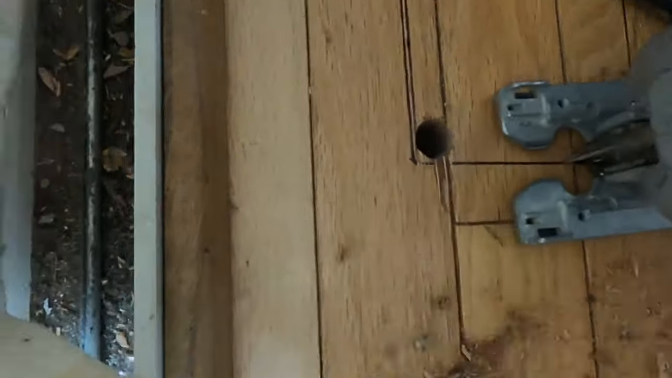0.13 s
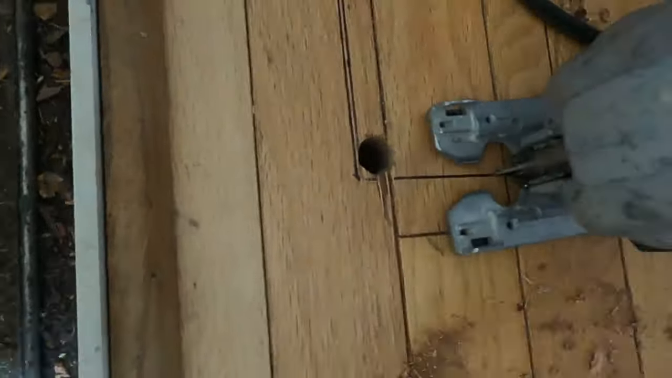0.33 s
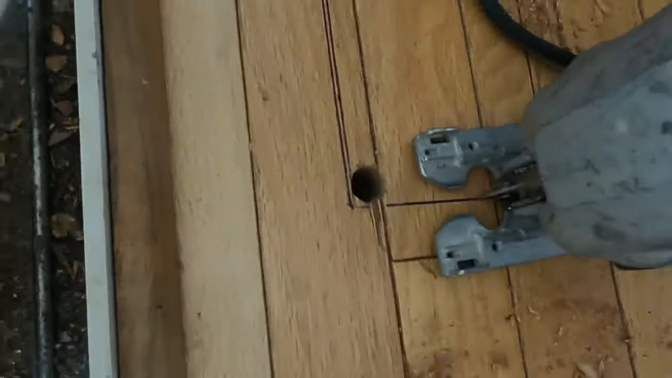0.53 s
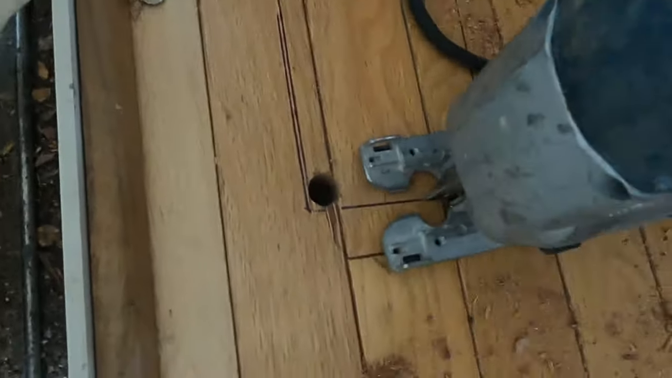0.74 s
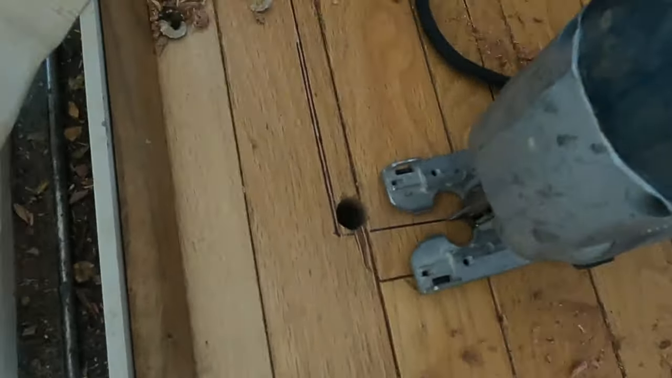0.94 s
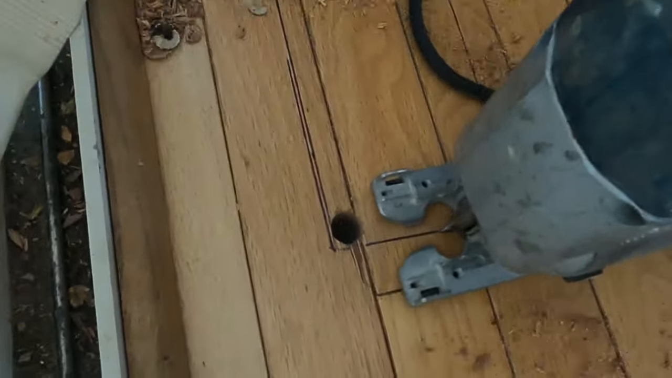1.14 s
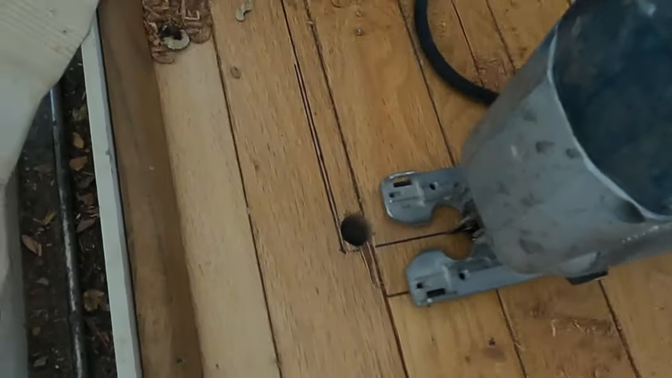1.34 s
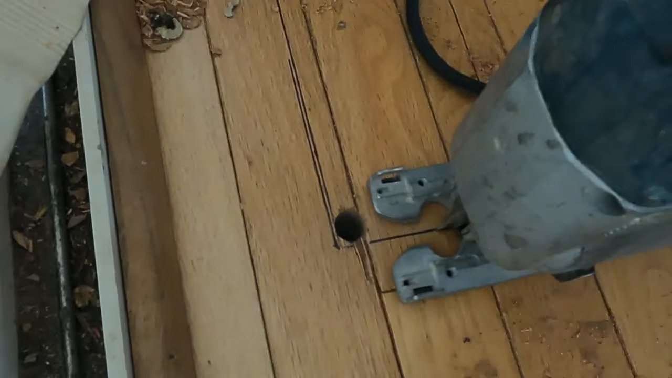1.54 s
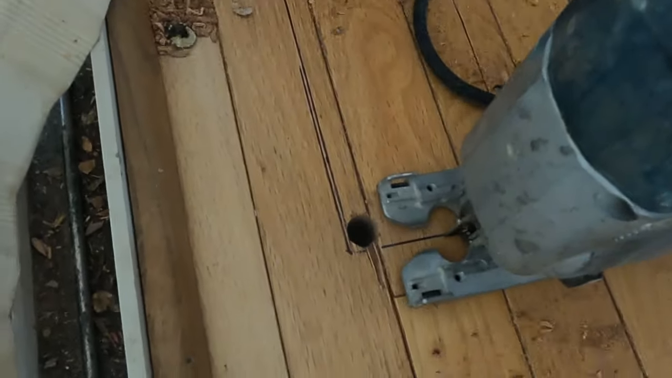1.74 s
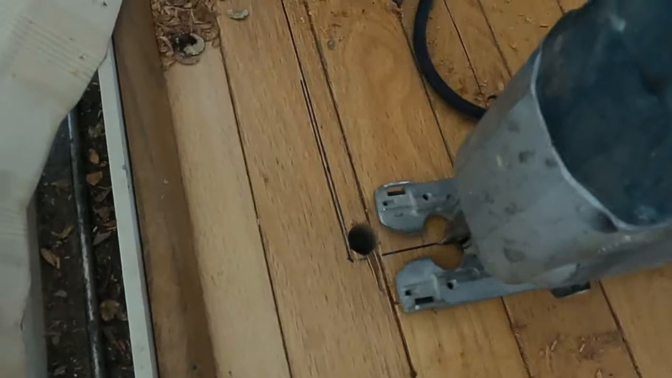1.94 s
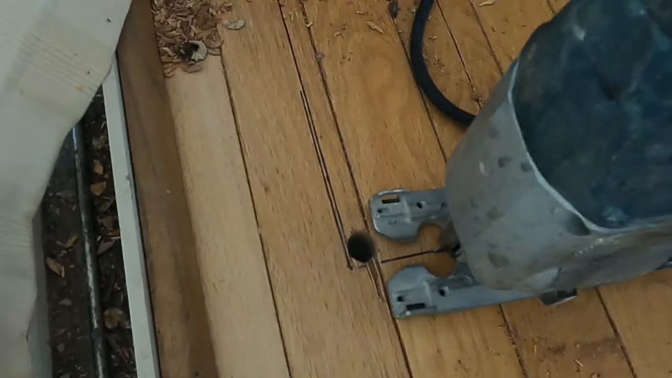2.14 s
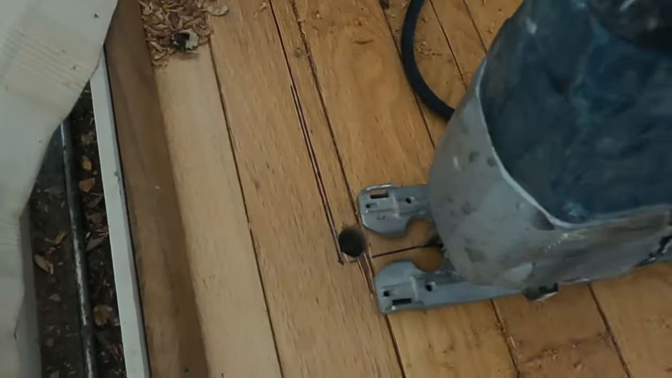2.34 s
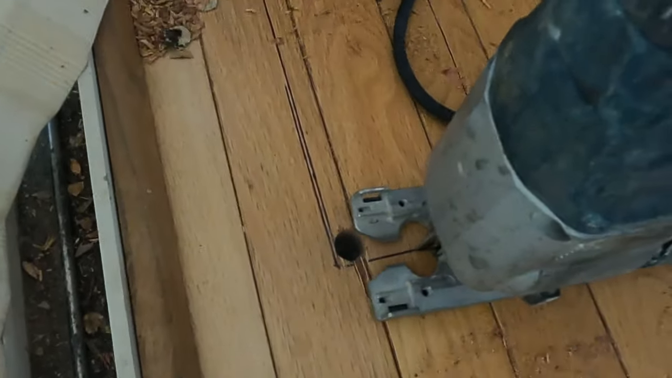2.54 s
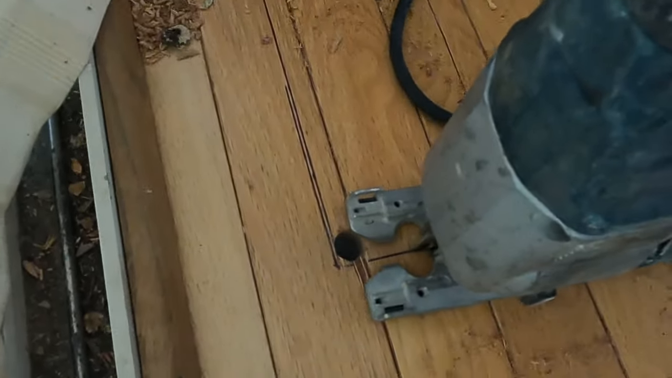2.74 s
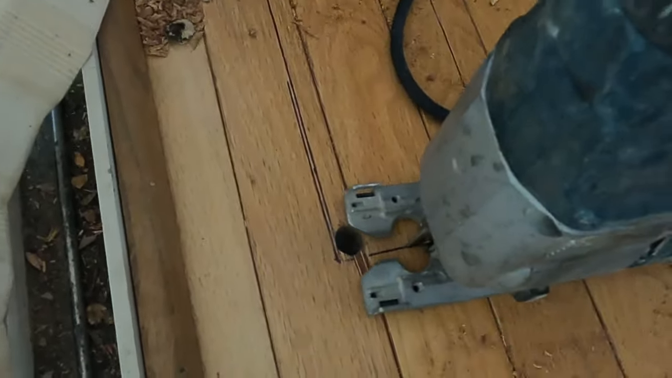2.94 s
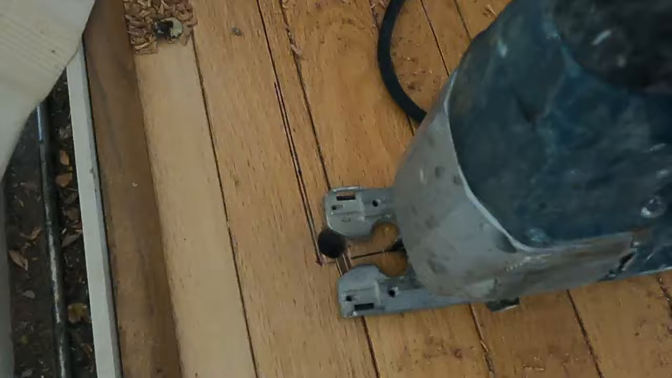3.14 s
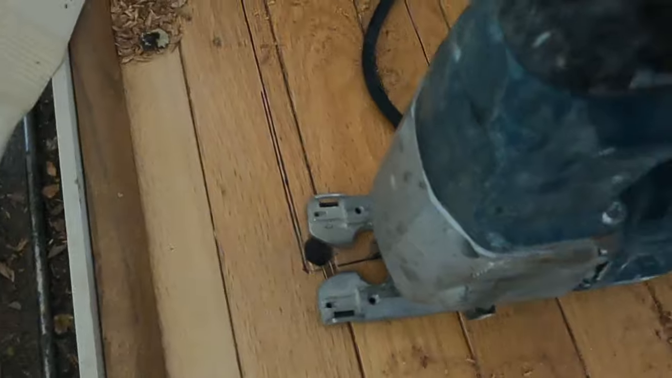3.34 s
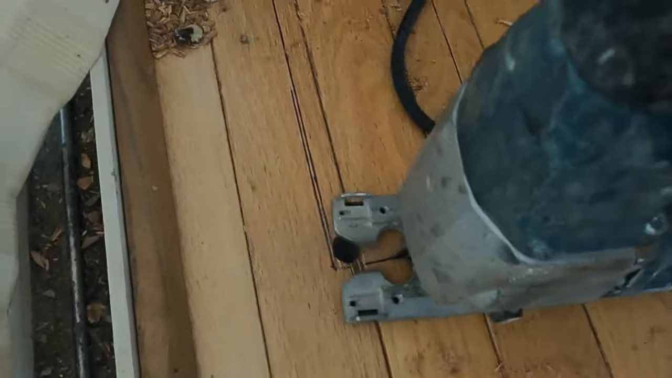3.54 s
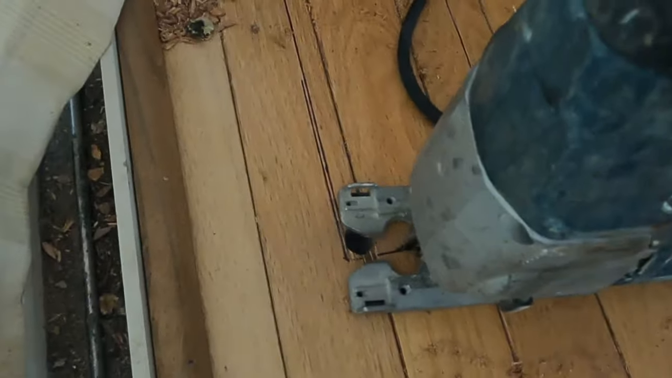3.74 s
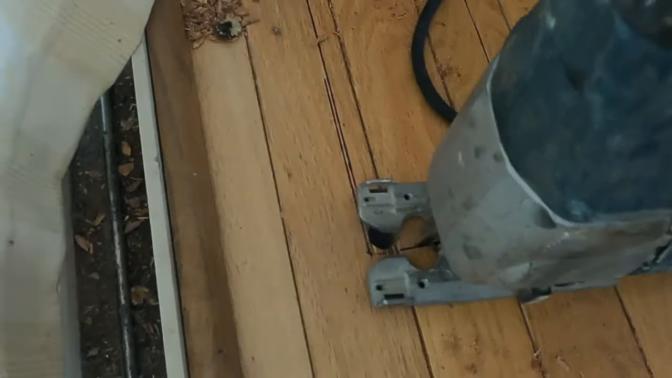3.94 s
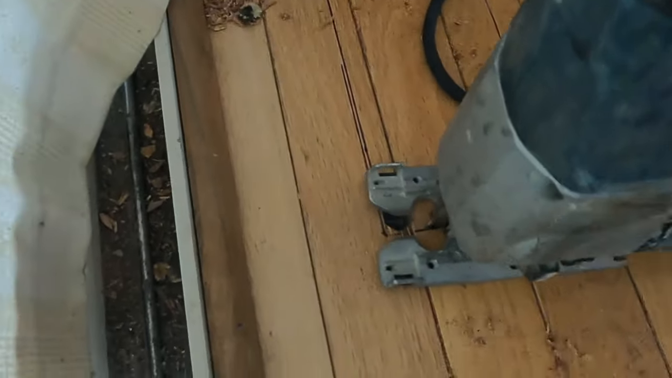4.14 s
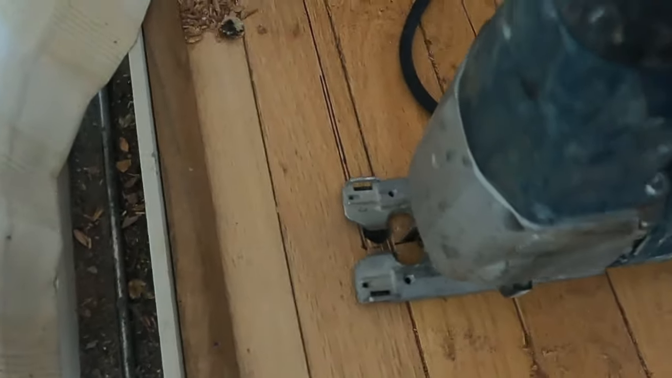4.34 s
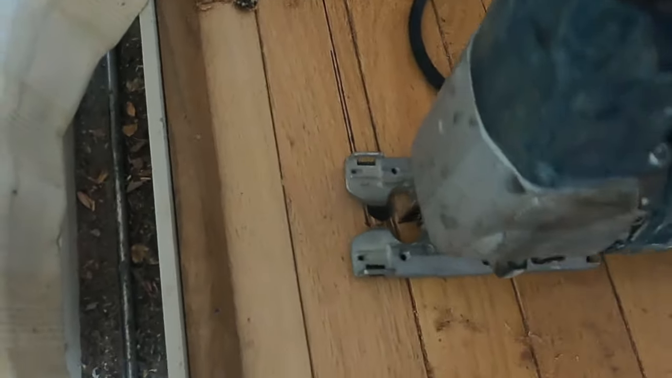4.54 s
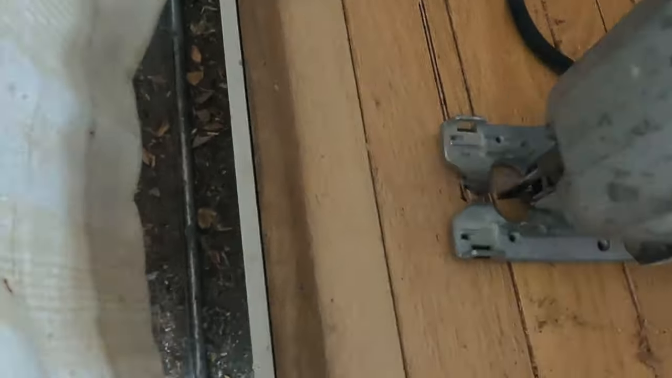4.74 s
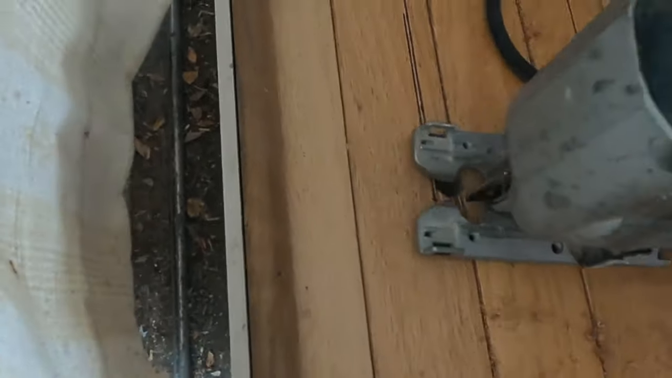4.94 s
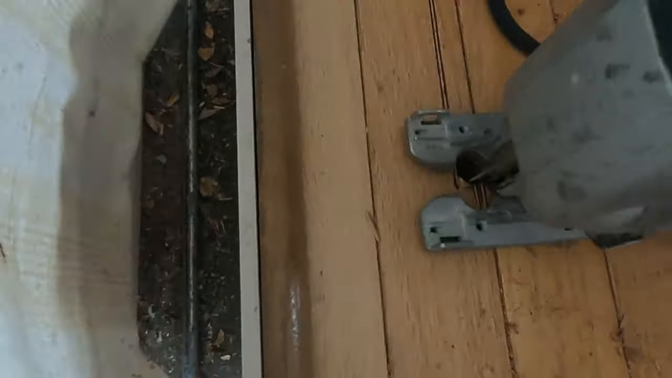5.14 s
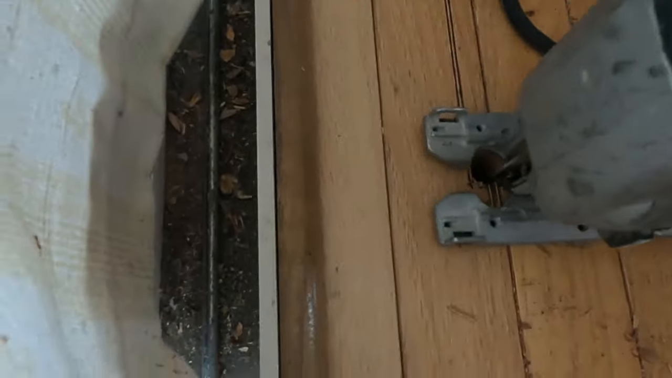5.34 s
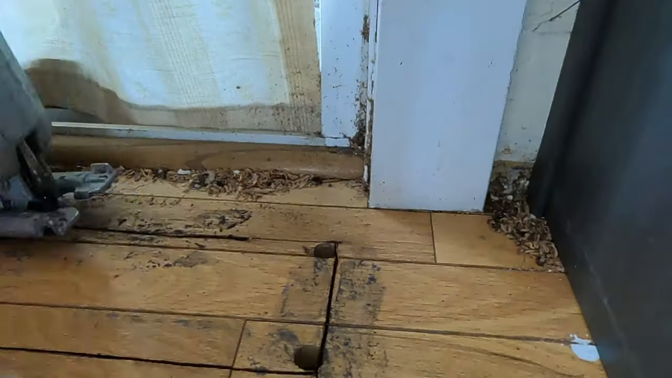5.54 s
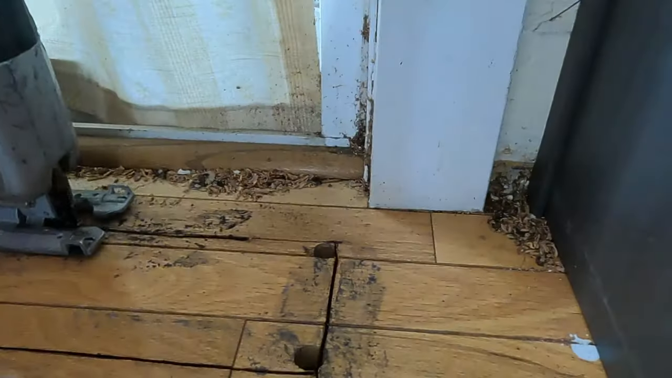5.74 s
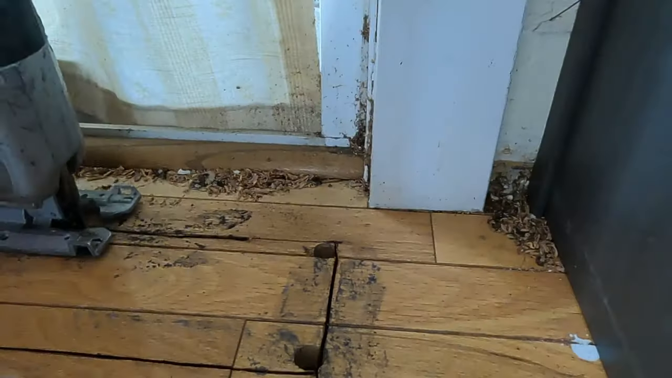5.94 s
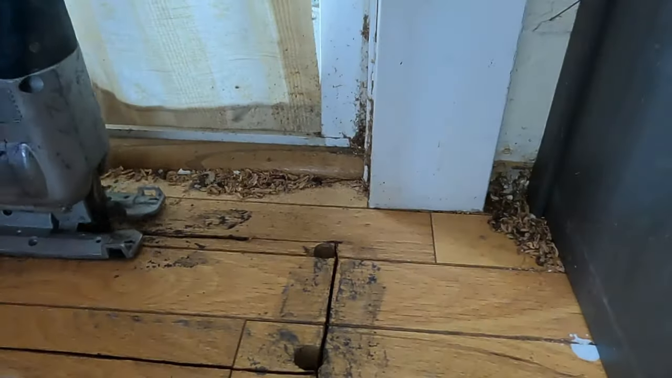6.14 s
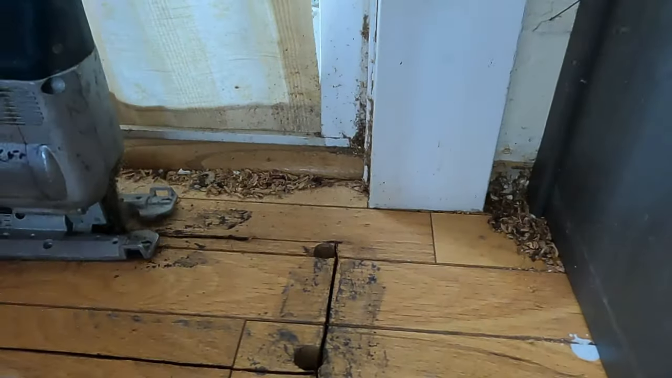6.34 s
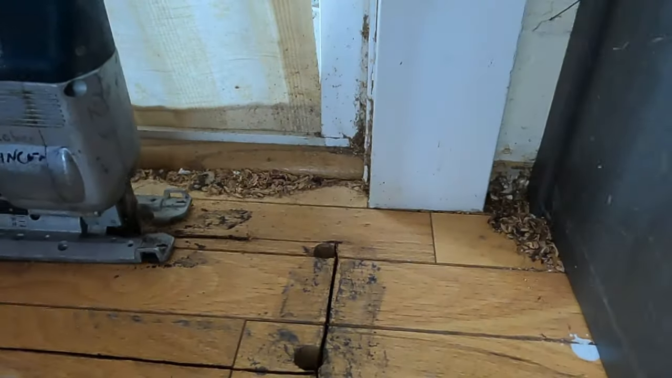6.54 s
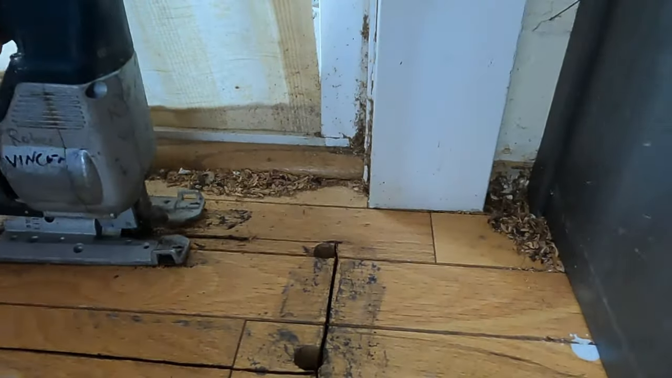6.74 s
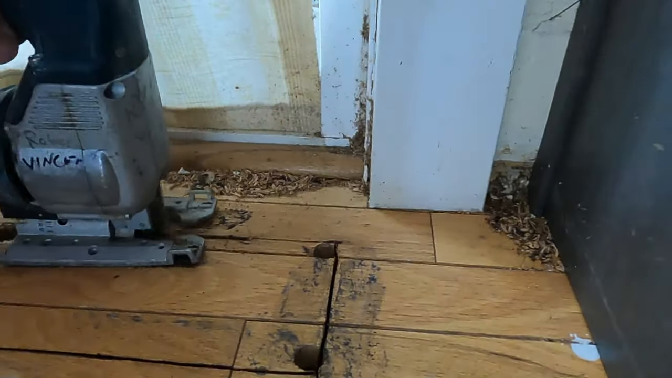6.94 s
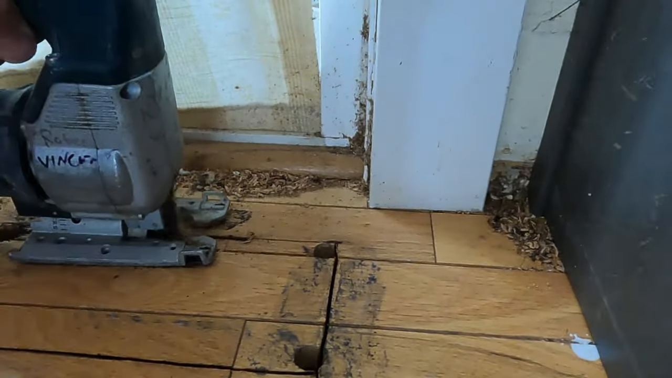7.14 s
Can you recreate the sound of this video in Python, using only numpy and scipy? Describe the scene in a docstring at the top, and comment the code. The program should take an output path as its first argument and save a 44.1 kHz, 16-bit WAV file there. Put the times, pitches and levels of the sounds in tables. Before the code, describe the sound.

Very close, a corded jigsaw cuts floorboards with a loud, steady, raspy buzz and thin gear whine. After several seconds it slows suddenly, surges faster and comes free with a brighter, thinner sound. Its shoe drums, rattles and snaps grit across the boards, then a slower, deeper, throbbing cut begins and continues to the end. Small, fairly dry indoor room, close stereo microphone.

```python
"""Jigsaw in floorboards

A corded jigsaw labours close by, coasts down, speeds up again, is pulled out running, then scrapes over the boards
and starts a second, deeper-sounding cut. Every blade stroke is a pulse that knocks the board; noise makes the grind
and the rasp of teeth, gears and fan, in step with the strokes; a sine is the gear whine. The scraping shoe drums,
rattles and snaps grit; the floor rumbles and a faint room tone lies underneath.
"""
import sys
import numpy as np
from scipy import signal
from scipy.fft import rfft, irfft, next_fast_len
from scipy.io import wavfile
from scipy.ndimage import uniform_filter1d, map_coordinates

SR = 44100
rng = np.random.default_rng(int(sys.argv[2]) if len(sys.argv) > 2 else 0)


def to_linear_factor(level_db):
    """Convert decibel levels (scalar or array-like) to linear amplitude factors."""
    exponent = np.asarray(level_db, float) / 20
    return 10 ** exponent


def materialize(psi):
    """Save the field psi as 16-bit PCM at rate SR to the path in sys.argv[1].

    A 1-D psi becomes a single channel; in a 2-D psi each row is a channel.
    """
    bounded = np.clip(np.atleast_2d(psi).T, -1, 1)
    quanta = np.round(bounded * 32767).astype(np.int16)
    wavfile.write(sys.argv[1], SR, quanta)


N = 317520  # samples, 7.2 s

# first cut, then pulled out running; levels before the flutter and the slow-blade loss:
# (time [s], knock level [dB], rasp level [dB], grind against knock [dB], unevenness of alternate strokes [0-1])
FIRST_LEVELS = [(0, -13, -29, -12.5, 0), (.15, -13, -25, -23, 0), (.58, -12, -27, -24.5, 0.03),
                (.7, -13, -26, -17, 0.16), (1.1, -11.5, -26.5, -25.5, 0.01), (1.6, -11.5, -24.5, -25, 0),
                (2.1, -13, -24, -22.5, .06), (2.65, -14, -22.5, -22, 0), (3.15, -14.5, -23, -23, 0),
                (3.5, -13.5, -23, -18.5, 0.06), (3.87, -13.5, -22.5, -16, .06),
                (4.1, -14.5, -20.5, -15, .14), (4.58, -13, -23.5, -17.5, 0.11),
                (4.68, -14.5, -22, -10, 0.07), (4.75, -13.5, -22, -4.5, .08), (4.9, -17, -22.5, -9, 0.12),
                (4.945, -11, -20.5, -5, 0), (5, -14, -22.5, -16, 0.03), (5.06, -12, -24, -10, 0.19),
                (5.07, -15, -23, -16, 0.17), (5.105, -20, -24, -15, 0.08), (5.125, -27, -23.5, -2, .1),
                (5.155, -21.5, -23.5, -11, 0.19), (5.2, -22, -24.5, -11, .12),
                (5.215, -16, -21.5, -16, .08), (5.284, -21, -21.5, -18, 0.01),
                (5.312, -15, -18.5, -16, 0.24), (5.35, -24, -20, -10, 0.02), (5.362, -19.5, -23, 4, 0.15),
                (5.392, -27, -20.5, 2, 0.11), (5.416, -17, -22, -5, .14), (5.46, -26, -21.5, 4, .14),
                (5.54, -50, -23, 5, 0.2), (5.575, -57, -23, -16, 0.02)]
# a slow blade hits softly: (stroke rate [Hz], level [dB])
SLOW_BLADE_LOSS = [(40, -43), (46, -36), (51, -14.5), (70, -4), (120, -0.5), (160, 0)]
# how the board answers a stroke as the cut moves on: (time [s], [(frequency [Hz], relative level [dB])])
FIRST_BOARD = [(.2, [(59, -71), (100, -26), (247, -27), (338, -6), (426, -29.5), (507, 0.5), (597, -17),
               (670, -2), (855, 1.5), (1600, -19), (2080, -74), (3520, -120)]), (.9, [(59, -9), (100, -28),
               (259, -6), (346, -2), (431, -42), (513, 5), (611, -0.5), (885, 8.5), (1240, -4), (1600, -29),
               (2080, -64), (3520, -120)]), (2, [(59, -73.5), (100, -32.5), (338, -9), (421, -30.5),
               (507, 4.5), (604, -29.5), (678, -1.5), (779, -8.5), (1230, -4.5), (1600, -51), (2080, -31.5),
               (3520, -120)]), (3.2, [(59, -73), (100, -29.5), (334, -11), (417, -3), (502, -2.5),
               (678, -7.5), (753, 6), (826, -2.5), (1200, -3.5), (1600, -33), (2080, -65), (3520, -120)]),
               (4.299, [(59, -21), (100, -38), (244, -37.5), (507, -2.5), (583, -20.5), (845, -1),
               (917, -5.5), (1180, -4), (1310, -28), (1600, -17), (2080, -26), (3520, -120)]),
               (4.75, [(59, -72), (100, -58), (240, -22), (320, 0), (420, 2), (544, -11), (670, 3),
               (735, -13), (994, -6.5), (1600, -27), (2080, -17.5), (3520, -120)]), (5.03, [(59, -72),
               (100, -18), (152, -34), (244, -22), (473, 2), (647, -5), (983, -3), (1600, -21.5),
               (2080, -53), (3520, -120)]), (5.111, [(59, -40), (100, -23), (346, 13), (686, -37), (875, 4),
               (1040, -30), (1210, -5), (1600, -26), (2080, -51), (3520, -120)]), (5.27, [(59, -53),
               (100, -17), (398, 2), (452, -2), (590, 7), (788, -1.5), (875, -50), (972, 0), (1600, -13),
               (2080, -59), (3520, -120)])]
# slow bending waves in the board arrive after the sharp knock: (frequency [Hz], delay [s])
FIRST_BENDING_DELAY = [(150, 0.0022), (500, 0.0048), (1200, 0.003134)]
# colour of teeth, gears and fan: (time [s], [(frequency [Hz], relative level per Hz [dB])])
FIRST_RASP = [(.4, [(940, -70), (1600, -8), (1920, 0), (2180, -7.5), (2820, -3.5), (4470, -11), (5580, -14),
              (6080, -10), (8040, -10), (8850, -7), (10000, -14), (11700, -7), (15900, -16)]),
              (1.5, [(940, -57), (1600, -12), (1900, -3), (2110, -15.5), (2900, -8), (3480, -10.5),
              (3760, -15), (4350, -7), (5170, -13.5), (8680, -10.5), (11800, -13), (13500, -9),
              (15900, -22)]), (2.5, [(940, -43), (1600, -3.5), (1780, -10), (1900, -3), (2010, -20),
              (2240, -13), (2370, -29), (2540, -6), (2790, -14.5), (4470, -5.5), (7660, -11.5),
              (12400, -6.5), (15900, -9.5)]), (3.301, [(940, -13), (1600, -16), (2000, 0.5), (2690, -11.5),
              (4830, 1.5), (5580, -10), (6320, 3.5), (6760, -3.5), (9020, -4), (11400, -3), (12300, 4),
              (14300, -5), (15900, -4)]), (4.2, [(940, -4), (1600, -16), (1870, -5), (2180, -29),
              (2540, -9.5), (3320, -12), (4600, -1.5), (5220, -10.5), (6020, -3), (7230, -6), (10300, -4),
              (12600, 1.5), (15900, -8)]), (5.2, [(940, -18), (1600, -9), (1800, -5), (2240, -7),
              (3870, -2.5), (4180, -1.5), (8350, -6.5), (12500, -2.5), (15900, -11)]), (5.53, [(940, -77),
              (1600, -44), (2790, -4), (3420, -10), (4140, 1.5), (5120, -10), (8600, -6), (9740, -9),
              (11800, -1.5), (15900, -9)])]
# colour of the blade grinding in its slot: (frequency [Hz], relative level per Hz [dB])
FIRST_GRIND = [(18, -81), (30, -45), (118, -17), (177, -13), (271, -13.5), (333, -1), (672, -8.5),
               (737, -14), (991, -4.5), (1410, -12), (2500, -20.5), (3250, -18), (5500, -120)]


def first_cut():
    """The saw labours, coasts and restarts; its narrow board radiates little deep bass."""
    rate_hz = speed()
    loss_db = along(SLOW_BLADE_LOSS, rate_hz)
    cut = saw(rate_hz, loss_db, curves(FIRST_LEVELS), FIRST_BOARD, FIRST_BENDING_DELAY, FIRST_RASP, FIRST_GRIND,
              chatter_db=5.0, whine_db=-20.5, spread_s=0.005, sharp=1.05, each=0.17, twice=0.62, lag=0.068)
    return filtered(cut, [(40, -9), (90, -5.5), (140, 0.5)])


# stroke rate while the motor labours: (time [s], stroke rate [Hz])
LOADED_SPEED = [(0.0, 166.8), (0.09, 172.8), (0.24, 171.1), (0.46, 175.6), (0.55, 174.9), (0.61, 175.7),
                (0.75, 172), (0.92, 175.8), (1.31, 170.8), (2.16, 174.8), (2.23, 171.8), (2.36, 172.2),
                (3.1, 168.3), (3.23, 171.0), (3.36, 166.9), (3.41, 165.9), (3.47, 165.4), (3.8, 167.6),
                (3.95, 167), (4.04, 169), (4.57, 164.7), (4.6, 165.7)]
# trigger and load changes: (time [s], speed aimed at [Hz], time constant [s])
SPEED_CHANGES = [(4.597, 36, .1), (4.908, 161.4, .025), (5.07, 196.1, .06), (5.365, 116.5, .08)]


def speed():
    """The motor follows its load, then slides exponentially towards a new speed after each change."""
    rate_hz, t = curves(LOADED_SPEED)[0], np.arange(N) / SR
    for start_s, aim_hz, time_constant_s in SPEED_CHANGES:
        fade = np.exp(-np.maximum(t - start_s, 0) / time_constant_s)
        slide = aim_hz + (np.interp(start_s, t, rate_hz) - aim_hz) * fade
        rate_hz = np.where(t < start_s, rate_hz, slide)
    return rate_hz


# second cut, levels before the flutter: (time [s], stroke rate [Hz], knock level [dB], rasp level [dB],
# grind against knock [dB], unevenness of alternate strokes [0-1])
SECOND_LEVELS = [(5.85, 49.9, -32, -46, -9, .07), (5.885, 52.94, -19, -30, -1, .07),
                 (5.924, 56.2, -14, -20.5, -5, .07), (5.955, 62.2, -16, -22, -6, .07),
                 (6.014, 76.9, -16, -18.5, -13, .07), (6.06, 81.9, -10.5, -20, -16, .07),
                 (6.12, 86.1, -12.5, -22.5, -13, .07), (6.2, 87.44, -14, -22.5, -12, .06),
                 (6.31, 88.25, -13.5, -22, -10.5, .05), (6.7, 84.5, -11, -23, -18, .05),
                 (6.742, 84.2, -13, -24, -16, .06), (6.765, 85.96, -15.5, -22, -13, .07),
                 (6.81, 86.3, -12, -22.5, -12, .07), (7.2, 85.3, -12.3, -22, -15.5, 0.054)]
# how the board answers a stroke: (time [s], [(frequency [Hz], relative level [dB])])
SECOND_BOARD = [(5.95, [(35, -36), (60, -28), (180, 6.5), (276, 6.5), (446, -12.5), (629, -2), (752, -20),
                (1280, -14), (1600, -16), (2080, -52), (3520, -120)]), (6.3, [(35, -53), (60, -18),
                (85, -15), (170, 3.5), (265, 4), (446, -13), (540, -10), (620, -23), (886, -9), (1000, -21),
                (1170, -9), (1410, -6), (1600, -35), (2080, -46), (3520, -120)]), (6.9, [(35, -51),
                (60, -19), (164, -17.5), (261, 3.5), (348, -16.5), (440, -12.5), (512, -30), (595, -12),
                (692, -20.5), (949, -25), (1090, -14), (1320, -16), (1600, -29), (2080, -65),
                (3520, -120)])]
# late arrival of slow bending waves: (frequency [Hz], delay [s])
SECOND_BENDING_DELAY = [(85, 0.0091), (170, 0.0096), (260, 0.0059), (400, 0.0031), (1000, 0.0012)]
# colour of teeth, gears and fan: (time [s], [(frequency [Hz], relative level per Hz [dB])])
SECOND_RASP = [(6, [(940, -24), (1600, -7), (2200, -1), (2560, -12), (2960, -1.5), (4560, -10.5),
               (6080, -7), (13400, -13.5), (15900, -16)]), (6.7, [(940, -22), (1600, -15), (2010, -14),
               (2400, -8), (2610, -9), (3170, -7), (4830, -13), (7810, -9), (11800, -16), (14600, -16),
               (15900, -20)])]
# colour of the blade grinding in its slot: (frequency [Hz], relative level per Hz [dB])
SECOND_GRIND = [(18, -64), (30, -29), (91, -44), (156, 4.5), (209, -2), (415, -8), (624, -5), (684, -1.5),
                (1330, -12.5), (1430, -3.5), (2500, -36), (3250, -51), (5500, -120)]


def second_cut():
    """Slower strokes on a board with lower resonances sound deeper."""
    rate_hz, *levels = curves(SECOND_LEVELS)
    return saw(rate_hz, 0, levels, SECOND_BOARD, SECOND_BENDING_DELAY, SECOND_RASP, SECOND_GRIND,
               chatter_db=-1.3, whine_db=-9.5, spread_s=0.0046, sharp=0.38, each=0.31, twice=0.58, lag=0.0796)


def saw(rate_hz, loss_db, levels, board, late, rasp, grind, chatter_db, whine_db, spread_s, sharp, each, twice, lag):
    """Knocks and grind share the knock level; the rasp swells at both ends of each stroke; the gears whine in step."""
    knock_db, rasp_db, grind_db, uneven, gate = levels
    flutter_db, flutter_hz = 0.83, 12  # levels flutter with the grain of the wood
    knock_db = knock_db + loss_db + flutter_db * wobble(flutter_hz)
    rasp_db = rasp_db + 1.41 * loss_db + 0.6 * flutter_db * wobble(flutter_hz)
    grind_db = grind_db + 0.52 * np.maximum(58 - rate_hz, 0)  # a crawling blade rubs more than it knocks

    # (change of speed / speed) a second; changing speed smears what repeats
    sliding = uniform_filter1d(np.gradient(np.log(rate_hz)) * SR, size=1500)
    blur_most_db = 10
    blur_db = np.minimum(8 * abs(sliding), blur_most_db)
    chatter_db = chatter_db - blur_db
    # the whine is louder while slowing down, softer while speeding up
    whine_db = rasp_db + whine_db + np.interp(sliding, [-5, -2, 0.3, 1.2], [6, 0, 0, -14])

    pulses, turns = strokes(rate_hz, uneven, jitter=0.0011, scatter_db=0.9)
    angle = 2 * np.pi * (turns - lag)
    swell = stroke_swell(angle, sharp, each, twice)
    rubbing = unit(filtered(np.sqrt(swell) * rng.standard_normal(N), grind))
    knock = changing(delayed(pulses, late), board) + to_linear_factor(grind_db) * rubbing
    knock = knock / np.sqrt(1 + to_linear_factor(2 * grind_db))  # the pair keeps the knock level
    teeth = hiss_in_bursts(swell) + to_linear_factor(chatter_db) * chatter(pulses, spread_s)
    hiss = changing(teeth / np.sqrt(1 + to_linear_factor(2 * chatter_db)), rasp)
    whine = gear_whine(angle, blur_db, blur_most_db)
    return gate * (to_linear_factor(knock_db) * knock + to_linear_factor(rasp_db) * hiss + to_linear_factor(whine_db) * whine)


def strokes(rate_hz, uneven, jitter, scatter_db):
    """One pulse per blade stroke, placed between samples; unevenness weakens every second stroke."""
    turns = np.cumsum(rate_hz) / SR
    k = np.arange(1, int(turns[-1]))
    chance = rng.standard_normal((len(k), 2))
    at = np.interp(k + jitter * chance[:, 0], turns, np.arange(N))  # jitter is a part of one stroke
    whole = at.astype(int)
    size = to_linear_factor(scatter_db * chance[:, 1]) * (1 + (-1) ** k * np.clip(uneven[whole], 0, 1))
    taps = whole[:, None] + np.arange(-7, 9)
    gap = taps - at[:, None]
    kernel = size[:, None] * np.sinc(gap) * np.cos(np.pi * gap / 16) ** 2
    pulses = np.bincount(np.clip(taps, 0, N - 1).ravel(), kernel.ravel(), N)
    return pulses / np.sqrt(rate_hz / rate_hz.mean()), turns  # faster strokes do not add power


def stroke_swell(angle, sharp, each, twice):
    """Rubbing swells once and twice a stroke, roughened by chips of uneven size."""
    chips_db = 1.5 * unit(uniform_filter1d(rng.standard_normal(N), size=70))
    return unit(to_linear_factor(chips_db) * np.exp(sharp * (each * np.cos(angle) + twice * np.cos(2 * angle))))


def hiss_in_bursts(swell):
    """Noise split around 6500 Hz; only the treble part comes in bursts with the strokes."""
    def split(hz):
        low_share = 1 / (1 + (hz / 6500) ** 4)
        return [low_share, 1 - low_share]
    low, high = shaped(rng.standard_normal(N), split)
    return low + swell * high


def gear_whine(angle, blur_db, blur_most_db):
    """Gear teeth meet 37 times a stroke and hum; the octave grows and the level flickers while the speed slides."""
    drift = 0.15 * unit(uniform_filter1d(rng.standard_normal(N), size=600))  # radians
    phase = 37 * angle + drift
    octave = to_linear_factor(-5 + blur_db - blur_most_db) * np.sin(2 * phase)
    return to_linear_factor(0.45 * blur_db * wobble(45)) * np.sqrt(2) * (np.sin(phase) + octave)


# part of the rasp that repeats stroke after stroke, before the chatter level: (frequency [Hz], level [dB])
REPEATING_PART = [(1600, 6), (3000, 3), (5000, 2), (7000, -1.5), (13000, -5)]


def chatter(pulses, spread_s):
    """Each stroke sets off the same run of tooth and gear contacts; its overtones swell and fade one by one."""
    run = np.transpose([np.arange(1, 81) * 200, spread_s * rng.random(80)])  # each frequency has its own delay
    contacts = shaped(delayed(unit(pulses), run), lambda hz: to_linear_factor(along(REPEATING_PART, hz)))
    z = signal.stft(contacts, nperseg=512)[2]
    field = uniform_filter1d(rng.standard_normal(z.shape), size=2, axis=0)
    field = uniform_filter1d(field, size=60, axis=1)
    fading_db = 4.5 * np.clip(unit(field), -3, 1.6) - 2.3
    return signal.istft(z * to_linear_factor(fading_db), nperseg=512)[1][:N]


# shoe dragged on the floor in two shoves, rattle before its stutter:
# (time [s], boom level [dB], rattle level [dB], grit level [dB])
SHOE_SCRAPE = [(5.565, -26, -36, -36), (5.58, -20, -24, -29), (5.62, -10, -16.5, -27),
               (5.635, -34, -28, -42), (5.645, -12, -20, -30.5), (5.694, -15, -23, -25.5),
               (5.712, -16, -16.5, -27), (5.726, -28, -17, -28), (5.735, -27, -29, -46),
               (5.76, -35, -28, -34.5), (5.795, -40, -38, -56), (5.842, -34, -54, -77)]
# colours of rattle and grit: (frequency [Hz], relative level per Hz [dB])
RATTLE_COLOUR = [(130, -26), (220, 0.5), (311, -7), (353, -14), (635, -6.5), (862, -22), (957, -16),
                 (1500, -25), (1950, -50), (3300, -120)]
GRIT_COLOUR = [(880, -33), (1500, 0.5), (2630, -8), (3310, -0.5), (4320, -8), (6670, -11), (7510, -15),
               (13000, -17), (15900, -28)]


def scrape():
    """The dragged shoe drums the hollow floor (an unsteady sine), rattles and grinds grit (coloured noise)."""
    boom_db, rattle_db, grit_db, gate = curves(SHOE_SCRAPE)
    boom_hz = 166 + 5 * wobble(30)
    boom = np.sqrt(2) * np.sin(2 * np.pi * np.cumsum(boom_hz) / SR)
    rattle = unit(filtered(rng.standard_normal(N), RATTLE_COLOUR))
    grit = unit(filtered(rng.standard_normal(N), GRIT_COLOUR))
    stutter_db = 1.5 * wobble(50)
    return gate * (to_linear_factor(boom_db) * boom + to_linear_factor(rattle_db + stutter_db) * rattle + to_linear_factor(grit_db) * grit)


# grit snaps, mostly under the shoe as it scrapes, one earlier at 5.152 s; crack before its trim and colour: #
# (time [s], crack level [dB], knock against that level [dB])
GRIT_SNAPS = [(5.6188, -10.5, 8), (5.636, -20, 2), (5.6589, -11, 4), (5.7, -8, 5), (5.7507, -13.5, 5),
              (5.77, -23, 3), (5.781, -28, 8), (5.8461, -33, 25), (5.856, -42, 29), (5.8885, -16, 5),
              (5.152, -30, 14)]
# colour of a crack: (frequency [Hz], level [dB])
SNAP_COLOUR = [(1500, -28), (3000, 2.5), (6500, -3), (10000, -6), (16000, -24)]


def ticks():
    """A short crack of noise over a dull wooden knock, a 260 Hz sine; each loses 60 dB in a set time."""
    cracks, knocks, t = np.zeros(N + SR), np.zeros(N + SR), np.arange(SR // 20) / SR
    for start_s, crack_db, knock_db in GRIT_SNAPS:
        span = slice(round(start_s * SR), round(start_s * SR) + len(t))
        cracks[span] += to_linear_factor(crack_db - 1.5 - 60 * t / 0.013) * rng.standard_normal(len(t))
        soft_start = 1 - np.exp(-t / 0.0018)
        knocks[span] += to_linear_factor(crack_db + knock_db - 60 * t / 0.034) * np.sin(2 * np.pi * 260 * t) * soft_start
    return filtered(cracks[:N], SNAP_COLOUR) + knocks[:N]


# the floor shakes under the saw, more when it is pulled out; before the wobble: (time [s], level [dB])
FLOOR_RUMBLE = [(0, -55), (3.8, -60), (4, -52), (5, -59.5), (5.11, -40), (5.56, -44)]


def rumble(lean_depth):
    """Low noise carried by the joists, partly unlike at left and right."""
    db, gate = curves(FLOOR_RUMBLE)
    colour = [(20, -28), (55, -15), (100, -3), (140, -26), (260, -36)]
    mid, side = unit(filtered(rng.standard_normal((2, N)), colour))
    side = to_linear_factor(-9) * lean_depth * side
    return gate * to_linear_factor(db + 1.7 * wobble(3.2)) * np.array([mid + side, mid - side])


# colour of the background: (frequency [Hz], relative level per Hz [dB])
ROOM_COLOUR = [(18, -37), (30, 9), (374, 1), (760, -30.5), (1460, -38), (1630, -90), (2230, -84),
               (16000, -55)]


def room_tone():
    """Faint steady noise, independent at left and right."""
    return to_linear_factor(-62) * unit(filtered(rng.standard_normal((2, N)), ROOM_COLOUR))


def unit(x):
    """Scales to rms 1."""
    return x / np.sqrt(np.mean(x ** 2) + 1e-20)


def along(points, hz):
    """Reads (frequency [Hz], value) points on a log axis."""
    f, v = np.transpose(points)
    return np.interp(np.log(hz + 1), np.log(f + 1), v)


def curves(rows):
    """One value per sample for each column, and a gate that is open while the rows last."""
    s, *cols = np.transpose(rows)
    t = np.arange(N) / SR
    gate = uniform_filter1d(((t >= s[0]) & (t <= s[-1])) * 1., size=200)
    return [np.interp(t, s, c) for c in cols] + [gate]


def wobble(rate):
    """A smooth random curve, rate knots a second."""
    return map_coordinates(rng.standard_normal(int(N * rate / SR) + 4), [np.arange(N) * rate / SR])


def filtered(x, spectrum):
    """Causal (minimum-phase) colouring by (frequency [Hz], level [dB]) points, no lower than -70 dB."""
    m = next_fast_len(N + 8192) // 2 * 2
    level_db = np.maximum(along(spectrum, np.fft.rfftfreq(m, 1 / SR)), -70)
    cepstrum = irfft(level_db * np.log(10) / 20, m)
    cepstrum[1:m // 2] *= 2  # folding the cepstrum makes the filter causal
    cepstrum[m // 2 + 1:] = 0
    return irfft(rfft(x, m) * np.exp(rfft(cepstrum)), m)[..., :N]


def changing(x, colours):
    """Cross-fades from one colour to the next; each has rms 1 around its own moment."""
    times, t, out = [s for s, _ in colours], np.arange(N) / SR, np.zeros(N)
    for k, (_, spectrum) in enumerate(colours):
        share = np.interp(t, times, np.arange(len(times)) == k)
        y = filtered(x, spectrum)
        out += share * y / np.sqrt(np.average(y ** 2, weights=share))
    return out


def shaped(x, response):
    """Multiplies the spectrum of x by a response of frequency."""
    m = next_fast_len(N + 8192)
    return irfft(rfft(x, m) * response(np.fft.rfftfreq(m, 1 / SR)), m)[..., :N]


def delayed(x, points):
    """Every frequency waits for its own (frequency [Hz], delay [s])."""
    return shaped(x, lambda hz: np.exp(-2j * np.pi * np.cumsum(along(points, hz)) * hz[1]))


def spread(mid, lean, depth):
    """Left and right carry the same sound, each band a little louder on one side."""
    side = depth * shaped(mid, lambda hz: along(lean, hz))
    return np.array([mid + side, mid - side])


# how far the first cut leans as the saw creeps to the right: (time [s], depth of the lean [factor])
LEAN_DEPTH = [(0, 0.03), (1.4, 0.12), (2.1, .6), (2.6, 0.95), (3.95, 1.05), (4.1, 0.62), (4.8, 0.6),
              (4.95, 1.2), (5.5, 1.3)]
# lean of the first cut, before the depth: (frequency [Hz], share added left and taken right [factor])
FIRST_LEAN = [(600, 0), (1050, -0.07), (1600, -0.02), (3000, -0.05), (4200, -0.13), (6000, -0.075),
              (9000, -0.11), (13000, -0.16)]
# lean of second cut, scrape and ticks: (frequency [Hz], share added left and taken right [factor])
SECOND_LEAN = [(200, 0), (500, -0.02), (800, -0.1), (1100, -0.05), (1600, -0.13), (2600, 0.1), (4000, 0.04),
               (6000, 0.18), (8500, -0.02), (11000, 0.04), (14600, 0.15)]


def scene():
    """Both cuts, the scrape between them, the shaking floor and the room, in stereo."""
    lean_depth = curves(LEAN_DEPTH)[0]
    first = spread(first_cut(), FIRST_LEAN, lean_depth)
    later = spread(second_cut() + scrape() + ticks(), SECOND_LEAN, 1)
    return first + later + rumble(lean_depth) + room_tone()


def top_cut(x):
    """Nothing passes above the cut-off."""
    return signal.sosfilt(signal.butter(12, 16860, fs=SR, output="sos"), x)


def record(dry):
    """Nothing is kept at or above the band limit of 15970 Hz."""
    mix = shaped(dry, lambda hz: hz < 15970)
    return top_cut(mix)


dry = scene()
out = record(dry)
materialize(out)
```